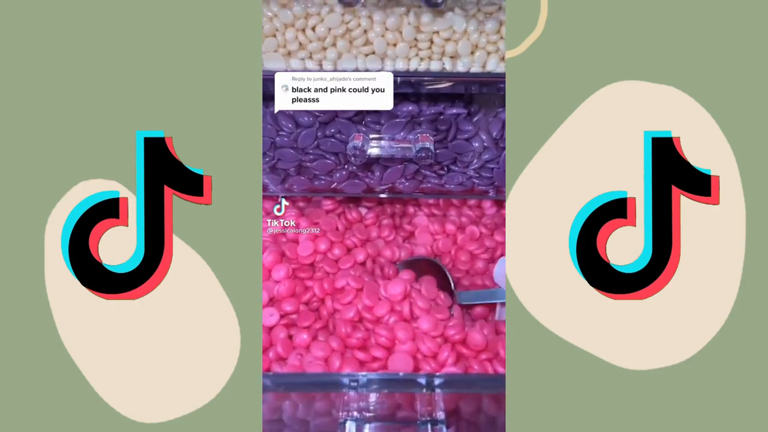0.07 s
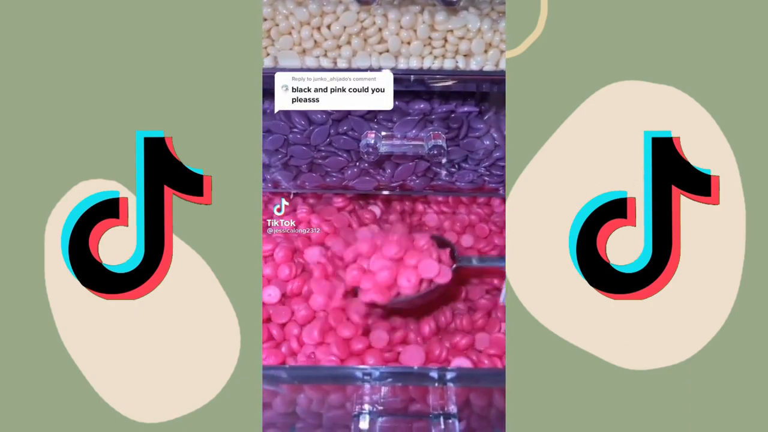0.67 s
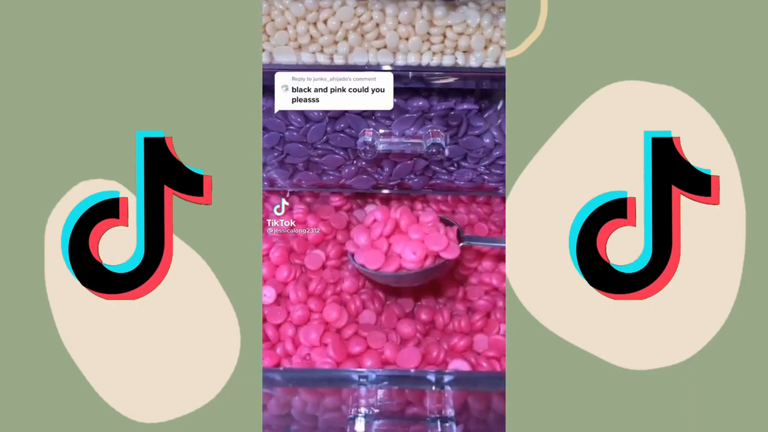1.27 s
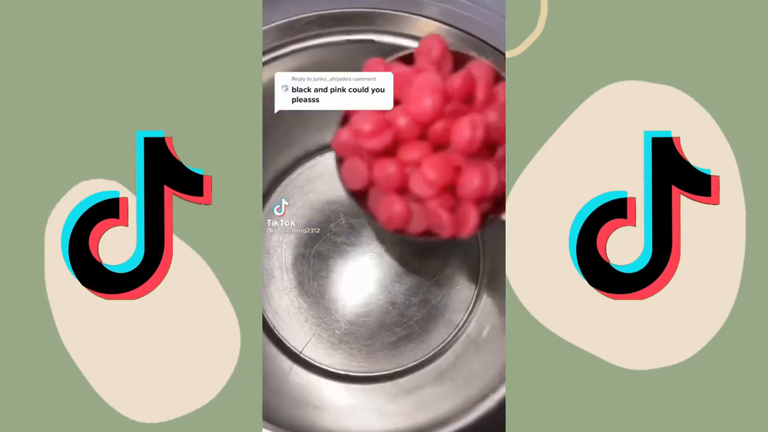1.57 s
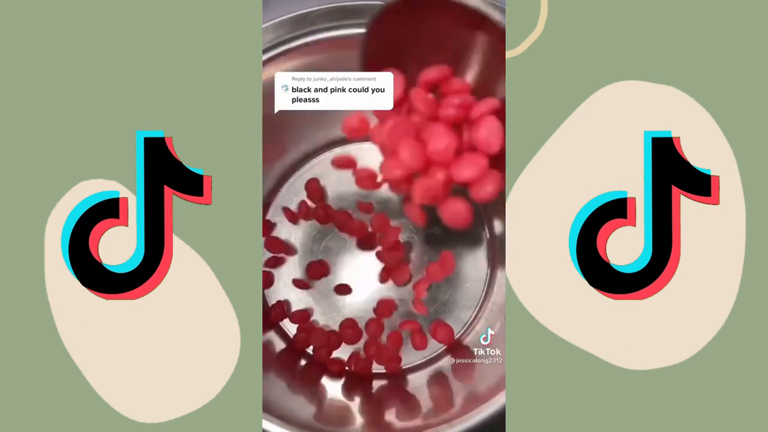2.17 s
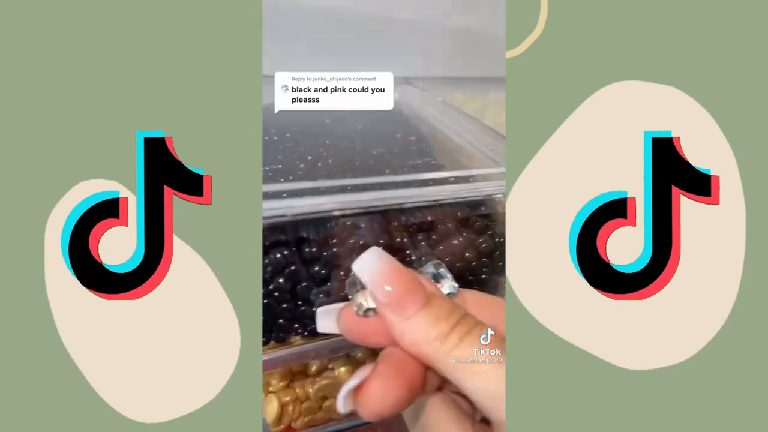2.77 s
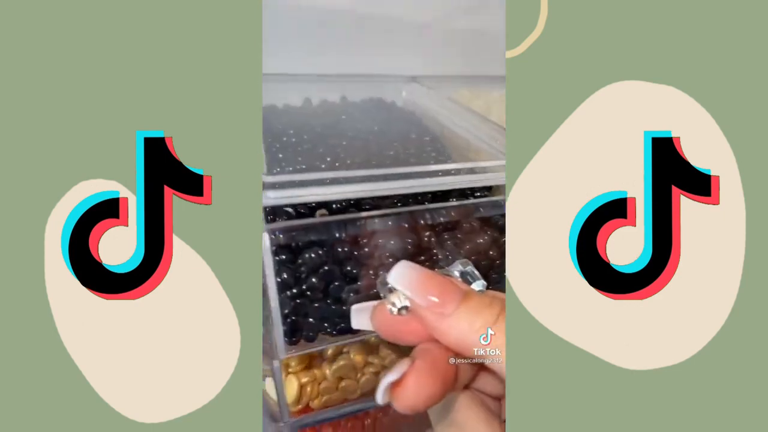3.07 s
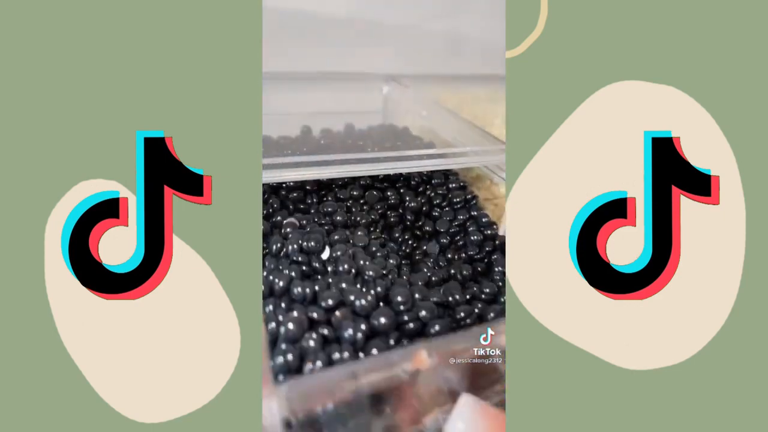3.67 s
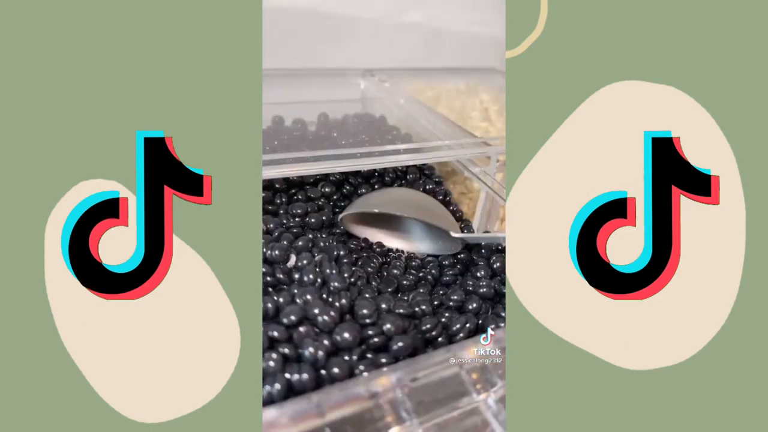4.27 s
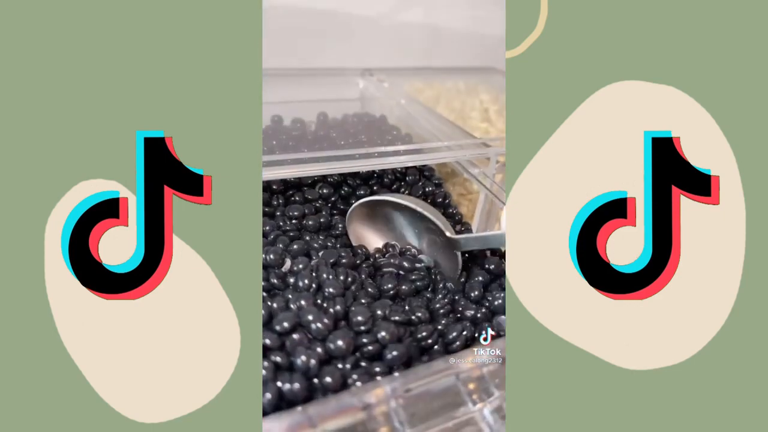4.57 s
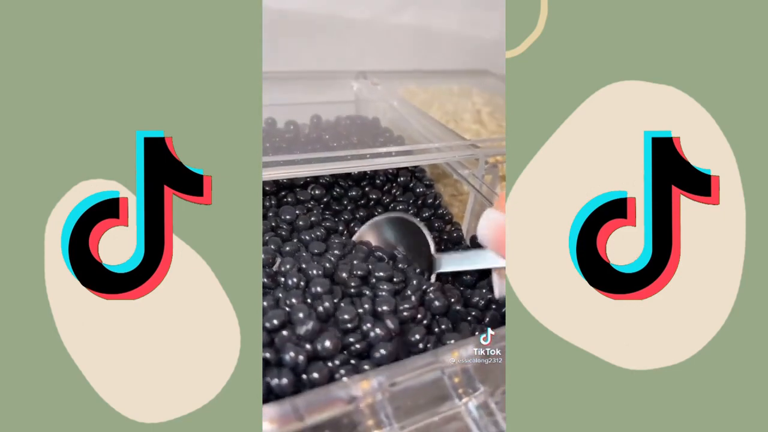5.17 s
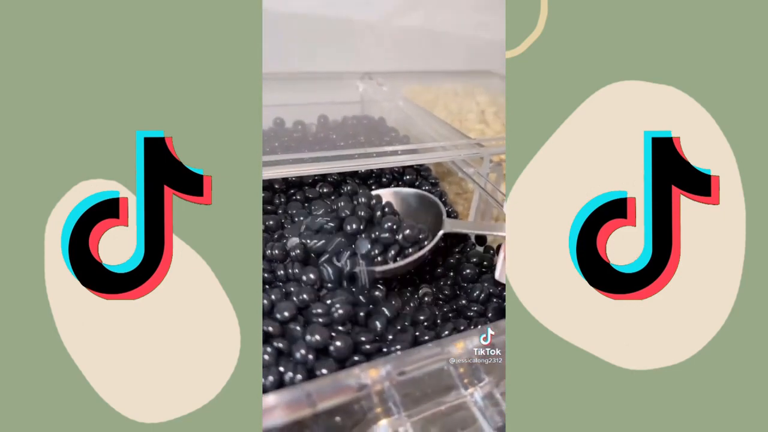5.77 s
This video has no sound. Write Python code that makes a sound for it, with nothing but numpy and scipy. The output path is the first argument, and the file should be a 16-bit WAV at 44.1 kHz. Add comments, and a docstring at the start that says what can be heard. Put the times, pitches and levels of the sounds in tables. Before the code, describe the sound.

Hard wax beads rattle as they are scooped from plastic bins and poured into a ringing steel bowl, with hollow knocks, heard close.

```python
"""Hard wax beads are dug from a plastic bin with a steel scoop and poured into a steel bowl.
Each impact is a brief broadband pulse, coloured by the resonances of the vessel it excites.
Flat beads are scooped and poured; a lid creaks by stick-slip friction and knocks back; then the
scoop thrusts into round beads, jams and lifts them. All is heard close up, over faint room noise
and a passing hum, in four passages separated by short silences."""
import sys
import numpy as np
from scipy import signal
from scipy.fft import rfft, irfft, next_fast_len
from scipy.io import wavfile
from scipy.ndimage import uniform_filter1d

SR = 44100
rng = np.random.default_rng(int(sys.argv[2]) if len(sys.argv) > 2 else 0)


def unload_wav(signal):
    """Save mono or channel-first audio to the path in sys.argv[1] as 16-bit WAV at rate SR, clipped to [-1, 1]."""
    wavfile.write(
        sys.argv[1],
        SR,
        np.round(np.clip(np.atleast_2d(signal).T, -1, 1) * 32767).astype(np.int16),
    )


N = 264776
TIME_S = np.arange(N) / SR
TOP_HZ = 15400

# loudest impacts among the flat beads: start_s, level_db (levels are relative within each table)
FLAT_IMPACTS = [(0.1815, -26.5), (0.2124, -20.5), (0.2264, -27), (0.2618, -29), (0.3466, -30),
                (0.4015, -21.5), (0.4189, -17), (0.4369, -22.5), (0.4604, -20.5), (0.4778, -15.5),
                (0.4914, -19.5), (0.5208, -24.5), (0.6185, -22.5), (0.6564, -26.5), (0.6744, -16.5),
                (0.6958, -16), (0.7282, -19.5), (0.7407, -18.5), (0.828, -27.5), (0.9058, -35.5),
                (1.0211, -31.5), (1.0919, -39)]
# pushes of the scoop: peak_s, level_db, build_s, settle_s
FLAT_PUSHES = [(.03, -39, 0.13, 0.041), (.225, -41.5, 0.032, 0.026), (.5, -35.5, 0.083, 0.044),
               (.735, -33, 0.045, 0.036), (1.02, -56, 0.43, 0.074)]
# response of the bin of flat beads: frequency_hz, gain_db
FLAT_RESPONSE = [(100, -19), (450, -14.5), (700, -7), (1000, -16), (1300, -6.5), (2200, -4), (3200, 0),
                 (4300, -11.5), (5200, -14), (8000, -6), (10500, -17), (14500, -13)]
# its resonances: pitch_hz, width_hz, lift_db
FLAT_MODES = [(699, 34, 8), (1252, 120, 8.5), (1713, 77, 10), (2220, 280, 7.5), (2787, 38, 7),
              (3140, 250, 2.5), (5135, 430, 12.5), (7030, 460, 3.5)]
def scoop_flat_beads():
    """Impact excitation: the scoop drives flat beads together and the plastic bin filters each click."""
    loud = impacts(FLAT_IMPACTS, rise_s=.0002, decay_s=.0021,
                   tail_db=-15, tail_s=.011, ping_db=-13, ping_s=.004)
    small = tumble(strokes(FLAT_PUSHES), per_s=330, scatter_db=1, decay_s=.0012)
    return resonate(undb(-10) * loud + undb(-1.5) * small, FLAT_RESPONSE, FLAT_MODES)


# clumps landing in the bowl: start_s, level_db, landing_s
CLUMPS = [(1.908, -29, 0), (1.9671, -24.5, 0.00023), (1.9867, -26, 0.004), (1.9989, -24, 0.015),
          (2.0526, -23.5, 0.0023), (2.0623, -21, .015), (2.102, -24, 0.0029), (2.1295, -26.5, 0.014),
          (2.15, -23.5, .011), (2.187, -23.5, 0.00073), (2.197, -24.5, 0.0033), (2.2165, -21.5, 0.017),
          (2.246, -21.5, 0.013), (2.293, -19, 0), (2.306, -24, 0.044), (2.328, -27.5, 0.016),
          (2.3518, -25.5, 0.019), (2.378, -22, 0.0024), (2.393, -23, 0.023), (2.413, -29.5, 0.017)]
# last stray beads hopping: start_s, level_db
STRAYS = [(2.4622, -23.5), (2.5187, -26), (2.5456, -26.5), (2.5715, -29.5), (2.601, -42), (2.6587, -47)]
# heap covering the bowl's floor: time_s, damped_fraction
HEAP_DAMPING = [(2.1, 0), (2.38, 0.18), (2.5, 0.6)]
# response of the steel bowl: frequency_hz, gain_db
BOWL_RESPONSE = [(40, -24), (110, -8), (250, -9.5), (520, -22.5), (850, 4), (1080, -8), (1400, -1),
                 (2100, -1.5), (2700, 4), (3400, -4), (6000, -2.5), (8300, -1), (10000, -8.5),
                 (12500, -7.5), (15000, -4.5)]
# its resonances: pitch_hz, width_hz, lift_db
BOWL_RESONANCES = [(770, 30, 2.5), (1243, 46, 9.9), (1680, 33, 6.4), (2414, 270, 4.1), (2651, 110, 9.2),
                   (2970, 260, 8.2), (3740, 48, 8.2), (4250, 150, 6.6), (4570, 29, 4), (5630, 400, 6.7),
                   (6020, 170, 8.7), (7690, 540, 11), (8060, 45, 4.7), (9000, 44, 9.6), (9330, 120, 6.8),
                   (11300, 220, 13), (12600, 260, 15), (14600, 840, 10)]
def pour_into_bowl(build_s=.001, fall_s=.012, bounce_s=.073, full_clump_s=.02):
    """Damped resonance: falling clumps of beads ring the bowl, and the growing heap mutes its modes."""
    leaders = impacts([(s, db) for s, db, _ in CLUMPS], rise_s=.0012, decay_s=.0018,
                      tail_db=-20.5, tail_s=.012, ping_db=-9, ping_s=.006)
    strays = impacts(STRAYS, rise_s=.001, decay_s=.002,
                     tail_db=-11, tail_s=.014, ping_db=-7.5, ping_s=.0077)
    landing_power = sum(envelope(s, db - 3, build_s, landing_s, fall_s) ** 2
                        for s, db, landing_s in CLUMPS if landing_s > 0)
    # the bigger the clump, the more beads go on bouncing
    bounce_power = sum(landing_s / full_clump_s * envelope(s, db - 17, build_s, landing_s, bounce_s) ** 2
                       for s, db, landing_s in CLUMPS)
    followers = tumble(np.sqrt(landing_power + bounce_power), per_s=700, scatter_db=2.5, decay_s=.0018)
    beads = leaders + undb(-11) * strays + followers
    damped = np.clip(np.interp(TIME_S, *np.transpose(HEAP_DAMPING)), 0, 1)
    ringing = resonate(beads, BOWL_RESPONSE, BOWL_RESONANCES)
    return (1 - damped) * ringing + damped * resonate(beads, BOWL_RESPONSE)


# loudest impacts among the round beads: start_s, level_db
ROUND_IMPACTS = [(4.789, -32), (5.034, -25), (5.3198, -27), (5.4124, -29), (5.5069, -26), (5.5588, -28),
                 (5.6161, -18.5), (5.6482, -25), (5.6636, -24), (5.7372, -29.5), (5.7763, -25),
                 (5.805, -22), (5.9631, -27.5)]
# thrusts of the scoop, each ending in a jam: jam_s, level_db, build_s, trickle_s
ROUND_THRUSTS = [(4.4, -48, 0.0058, 0.12), (4.521, -31, 0.0096, 0.073), (4.6002, -47, 0.0039, 0.015),
                 (4.8145, -28.5, 0.022, 0.085), (4.917, -47, 0.0021, 0.2), (5.048, -30, 0.007, 0.16),
                 (5.199, -38.5, 0.011, 0.085), (5.214, -39.5, 0.0078, 0.31)]
# response of the bin of round beads: frequency_hz, gain_db
ROUND_RESPONSE = [(100, -12.5), (400, -7), (630, -23), (900, -2), (1100, -8), (1800, -2.5), (2500, 2),
                  (3200, -1), (4200, -11.5), (8000, -12), (10500, -21.5), (14500, -19)]
# its resonances: pitch_hz, width_hz, lift_db
ROUND_MODES = [(857, 48, 9), (1416, 36, 6.7), (2420, 150, 1.4), (2740, 72, 2.3), (5880, 82, 3.6),
               (7750, 440, 2.6)]
def scoop_round_beads(crunch_s=.01):
    """Granular flow: round beads crunch and trickle at each thrust, then spill from the rising scoop."""
    loud = impacts(ROUND_IMPACTS, rise_s=.0001, decay_s=.0013,
                   tail_db=-23, tail_s=.036, ping_db=-11.5, ping_s=.0037)
    crunch = sum(envelope(s, db - 5, build_s, 0, crunch_s) for s, db, build_s, _ in ROUND_THRUSTS)
    trickle = undb(-19) * strokes(ROUND_THRUSTS)
    last_jam_s = ROUND_THRUSTS[-1][0]
    spill = envelope(5.63, -44.5, build_s=.25, hold_s=.14, settle_s=.32) * (TIME_S > last_jam_s)
    small = tumble(np.hypot(crunch + trickle, spill), per_s=700, scatter_db=5.5, decay_s=.0017)
    return resonate(undb(-12) * loud + small, ROUND_RESPONSE, ROUND_MODES)


# knocks on the bin: start_s, level_db, pitch_hz, decay_s
BIN_KNOCKS = [(2.965, -41, 434, 0.01), (2.991, -50, 295, 0.027), (3.073, -53.5, 430, 0.011),
              (3.152, -48.5, 296.7, 0.028), (3.727, -43.5, 362, 0.0093), (4.165, -23.5, 318, 0.017),
              (4.408, -46, 313, 0.04), (4.492, -41, 323, 0.035), (4.526, -34.5, 323.5, 0.022),
              (4.602, -24.5, 319, 0.0071), (4.635, -33, 370, 0.0049), (4.798, -28, 314.5, 0.031),
              (4.921, -38, 290, 0.015), (5.054, -26.5, 298.4, 0.014), (5.142, -37, 555, 0.0054),
              (5.217, -28.5, 282, 0.015), (5.298, -41, 298, 0.012), (5.348, -40, 283, 0.016)]
# modes of the bin walls: pitch_ratio, level_db
BIN_WALL_MODES = [(.38, -13.5), (0.651, -27.5), (0.999, -1.5), (1.16, -8.5), (1.88, -22), (2.68, -24.5)]
# rumble of the load of beads: frequency_hz, gain_db
RUMBLE_RESPONSE = [(50, -27), (95, -21), (125, 0), (165, -8), (205, 0), (300, 1), (450, -6), (700, -16.5),
                   (950, -21), (1500, -27), (4000, -42), (15000, -56)]
# hollow clack of the bin: frequency_hz, gain_db
CLACK_RESPONSE = [(200, -14.5), (500, -23.5), (700, -12.5), (950, -0.5), (1400, -12), (2500, -11),
                  (5000, -31.5), (15000, -37)]
def bin_knocks(swell_s=.0055, rumble_s=.02, clack_s=.0025):
    """Modal vibration: shoved by lid or scoop, the bin clacks, its walls ring and its load rumbles."""
    t = np.arange(SR // 4) / SR
    swell = 1 - np.exp(-t / swell_s)
    ring, rumble, clack = np.zeros((3, N))
    for s, db, pitch_hz, decay_s in BIN_KNOCKS:
        walls = np.zeros(len(t))
        for ratio, mode_db in BIN_WALL_MODES:
            detune, phase = rng.standard_normal(2)
            mode_hz = pitch_hz * ratio * (1 + .02 * detune)
            walls += undb(mode_db) * np.sin(2 * np.pi * mode_hz * t + np.pi * phase)
        add(ring, s, undb(db + 1.5) * swell * np.exp(-t / decay_s) * walls)
        add(rumble, s, undb(db - 4) * swell * np.exp(-t / rumble_s) * rng.standard_normal(len(t)))
        add(clack, s, undb(db - 6) * swell * np.exp(-t / clack_s) * rng.standard_normal(len(t)))
    return ring + resonate(rumble, RUMBLE_RESPONSE) + resonate(clack, CLACK_RESPONSE)


def scoop_jams():
    """Granular jamming: beads lock with a crack, pass the push on to the bin and rumble as they shift."""
    stops = [(s, db) for s, db, _, _ in ROUND_THRUSTS]
    crack = impacts(stops, rise_s=.0001, decay_s=.0032,
                    tail_db=-31, tail_s=.0099, ping_db=-24, ping_s=.0037)
    push = impacts(stops, rise_s=.001, decay_s=.005, tail_db=-16, tail_s=.018, ping_db=-20, ping_s=.004)
    shifting = tumble(undb(-17) * strokes(ROUND_THRUSTS), per_s=130, scatter_db=4, decay_s=.0092)
    beads = undb(-2) * resonate(crack, ROUND_RESPONSE, ROUND_MODES)
    steel = undb(-17) * resonate(crack, STEEL_RESPONSE)
    clack = undb(-2) * resonate(push, CLACK_RESPONSE)
    return beads + steel + clack + resonate(shifting, RUMBLE_RESPONSE)


# touches of the bare scoop: start_s, level_db
STEEL_TICKS = [(.9065, -46), (.9573, -44.5), (1.943, -48), (2.6958, -50), (2.701, -37), (2.7165, -47.5),
               (4.1205, -56.5)]
# light rubs past a rim: peak_s, level_db, build_s, settle_s
STEEL_RUBS = [(1.86, -66.5, 0.047, 0.042), (4.1, -72.5, 0.052, 0.047)]
# response of the steel scoop: frequency_hz, gain_db
STEEL_RESPONSE = [(300, -26.5), (1500, -5.5), (4500, -11), (6000, -1.5), (10500, -7), (13000, -1.5),
                  (15500, -8)]
# resonances of its rim: pitch_hz, width_hz, lift_db
STEEL_MODES = [(4360, 300, 20), (7050, 350, 10), (12200, 150, 12), (14400, 340, 14)]
def bare_scoop():
    """Hard contact: brief touches on steel give bright, dry ticks, and friction rings the scoop's rim."""
    ticks = impacts(STEEL_TICKS, rise_s=.001, decay_s=.0016,
                    tail_db=-20, tail_s=.011, ping_db=-15, ping_s=.003)
    rub = tumble(strokes(STEEL_RUBS), per_s=1100, scatter_db=8, decay_s=.002)
    return resonate(ticks, STEEL_RESPONSE) + resonate(rub, STEEL_RESPONSE, STEEL_MODES)


# creaks of the hinge: start_s, length_s, level_db, initial_slips_per_s
HINGE_CREAKS = [(2.808, .063, -67.5, 280), (2.8846, .09, -61, 162), (3.0103, .016, -57, 92),
                (3.817, .012, -62.5, 125)]
# response to one slip: frequency_hz, gain_db
SLIP_RESPONSE = [(200, -12), (1200, -6), (1800, -24), (2400, 2), (4200, -6.5), (5200, -14), (15000, -32)]
# hiss of the freely moving lid: frequency_hz, gain_db
SLIDE_RESPONSE = [(300, 11.5), (650, -6), (900, -8), (1600, -10.5), (3000, -6.5), (4200, -7.5), (8000, -9),
                  (15000, -16.5)]
# resonances of the plastic lid: pitch_hz, width_hz, lift_db
LID_RESONANCES = [(1030, 50, 1.5), (1259, 53, 13.7), (2330, 420, 7.2), (3050, 140, 4.7)]
def lid(max_slips=40, jitter=.12, slowing_s=.11):
    """Stick-slip friction: the hinge snaps the lid in slowing pulses, then runs free with a soft hiss."""
    slips = np.zeros(N)
    for start_s, length_s, db, slips_per_s in HINGE_CREAKS:
        age_s = 0
        for stretch in np.exp(jitter * rng.standard_normal(max_slips)):
            if age_s < length_s:
                add(slips, start_s + age_s, undb([db]))
                age_s += stretch * np.exp(age_s / slowing_s) / slips_per_s
    creak = undb(21) * resonate(slips, SLIP_RESPONSE, LID_RESONANCES)
    swing = envelope(3.234, -64.5, build_s=.096, hold_s=.45, settle_s=.25)
    slide = tumble(swing, per_s=720, scatter_db=2.5, decay_s=.00846)
    return creak + resonate(slide, SLIDE_RESPONSE, LID_RESONANCES)


def room_echo(sound, wet_db=-20, t60_s=.3, delay_s=.008):
    """Reverberation: dense reflections from the room follow the sound and decay exponentially."""
    t = np.arange(SR // 2) / SR
    echo = rng.standard_normal(len(t)) * np.exp(-np.log(1000) * t / t60_s) * (t > delay_s)
    return undb(wet_db) * signal.fftconvolve(sound, echo / np.linalg.norm(echo))[:N]


def hum(pitch_hz=127):
    """Random modulation: a low tone wavers in level and pitch as its two quadrature parts wander."""
    knots = np.linspace(0, N, 130)
    in_phase = np.interp(np.arange(N), knots, rng.standard_normal(len(knots)))
    quadrature = np.interp(np.arange(N), knots, rng.standard_normal(len(knots)))
    phase = 2 * np.pi * pitch_hz * TIME_S
    level = envelope(.93, -59, build_s=.23, hold_s=.57, settle_s=.0093)
    return level * ((1 + in_phase) * np.sin(phase) + quadrature * np.cos(phase))


# spectrum of the room noise: frequency_hz, gain_db
ROOM_SPECTRUM = [(25, -23), (55, -6), (110, -7.5), (165, -10.5), (205, -5.5), (330, -11.5), (500, -12),
                 (850, -14.5), (1350, -24), (2700, -30.5), (5000, -42.5), (15000, -49.5)]
def room_noise():
    """Ambient noise: a steady random background with most of its power in the bass."""
    return resonate(rng.standard_normal(N), ROOM_SPECTRUM)


def impacts(rows, rise_s, decay_s, tail_db, tail_s, ping_db, ping_s, ping_count=7):
    """Impact transients: each (start_s, level_db) contact gives a crack, short pings and a weak tail."""
    t = np.arange(SR // 8) / SR
    onset = slice(SR // 400)
    decay = np.hypot(np.exp(-t / decay_s), undb(tail_db) * np.exp(-t / tail_s))
    shape = decay * (1 - np.exp(-t / rise_s))
    fade = 1 - t / t[-1]
    out = np.zeros(N)
    for start_s, db in rows:
        # the place of contact decides which pitches ring
        pitches_hz = rng.uniform(900, TOP_HZ, (ping_count, 1))
        pings = undb(ping_db) * np.exp(-t / ping_s) * np.sin(2 * np.pi * pitches_hz * t).sum(axis=0)
        spectrum = rfft(shape * rng.standard_normal(len(t)))
        # a hard contact feeds all broad bands alike
        band_power = uniform_filter1d(np.abs(spectrum) ** 2, size=160)
        crack = irfft(spectrum / np.sqrt(band_power), len(t))
        hit = crack / np.sqrt(np.mean(crack[onset] ** 2)) + pings
        add(out, start_s, undb(db) * hit * fade / np.sqrt(np.mean(hit[onset] ** 2)))
    return out


def tumble(level, per_s, scatter_db, decay_s):
    """Shot noise: small contacts of random timing and force add in energy and follow a given level."""
    touch = rng.random(N) < per_s / SR
    force = undb(scatter_db * np.clip(rng.standard_normal(N), -2, 2))
    energy = signal.lfilter([1], [1, -np.exp(-1 / (decay_s * SR))], touch * force ** 2) + 1e-9
    local_mean = np.abs(uniform_filter1d(energy, SR // 16)) + 1e-9
    return np.sqrt(energy / local_mean) * rng.standard_normal(N) * level


def resonate(excitation, response, modes=()):
    """Linear filtering: a broad response with resonance peaks on it, scaled to unit power gain."""
    n = 2 * next_fast_len(N // 2 + SR // 10)
    hz = np.arange(n // 2 + 1) * SR / n
    knots_hz, knots_db = np.transpose(response)
    gain = undb(np.interp(np.log(hz + 1), np.log(knots_hz), knots_db))
    for pitch_hz, width_hz, lift_db in modes:
        detuning = 2 * (hz - pitch_hz) / width_hz
        gain *= np.sqrt(1 + (undb(lift_db) ** 2 - 1) / (1 + detuning ** 2))
    gain /= np.sqrt(np.mean(gain ** 2 * (hz < TOP_HZ)))
    # minimum phase: the ringing follows the strike
    cepstrum = irfft(np.log(gain))
    cepstrum[1:n // 2] *= 2
    cepstrum[n // 2 + 1:] = 0
    return irfft(rfft(excitation, n) * np.exp(rfft(cepstrum)))[:N]


def envelope(peak_s, level_db, build_s, hold_s, settle_s):
    """Exponential growth and decay: a gain reaches its level at peak_s, holds, then dies away."""
    t = TIME_S - peak_s
    early, late = np.maximum(-t, 0), np.maximum(t - hold_s, 0)
    return undb(level_db) * np.exp(-np.minimum(early / build_s + late / settle_s, 30))


def strokes(rows):
    """Summed envelopes: each stroke swells and at once settles."""
    return sum(envelope(s, db, build_s, 0, settle_s) for s, db, build_s, settle_s in rows)


def undb(db):
    """Decibels to amplitude ratio."""
    return 10 ** (np.asarray(db) / 20)


def add(out, start_s, sound):
    """Superposition: mix a sound in at start_s."""
    i = int(np.clip(start_s * SR, 0, N - 1))
    out[i:i + len(sound)] += sound[:N - i]


# audible passages and their room noise: start_s, end_s, noise_start_db, noise_end_db
PASSAGES = [(0, 1.459, -59.5, -57.5), (1.534, 2.729, -86.5, -68), (2.807, 4.228, -73, -68),
            (4.308, 6.079, -76.5, -55.5)]
def scene(fade_s=.003):
    """Superposition: all sources sound in four gated passages, each with its own level of room noise."""
    beads = scoop_flat_beads() + pour_into_bowl() + scoop_round_beads()
    direct = beads + bare_scoop() + lid() + bin_knocks() + scoop_jams()
    sound = direct + room_echo(direct) + hum()
    noise = room_noise()
    out = undb(-97.5) * noise
    for start_s, end_s, start_db, end_db in PASSAGES:
        gate = np.clip(np.minimum(TIME_S - start_s, end_s - TIME_S) / fade_s, 0, 1)
        noise_gain = undb(np.interp(TIME_S, [start_s, end_s], [start_db, end_db]))
        out += gate * (sound + noise_gain * noise)
    return out[None]


def record(dry):
    """Band limiting: the microphone drops the deepest bass and the highest treble."""
    high_pass = signal.butter(2, 35, "high", fs=SR, output="sos")
    low_pass = signal.ellip(8, .2, 70, TOP_HZ, fs=SR, output="sos")
    return signal.sosfilt(low_pass, signal.sosfilt(high_pass, dry))


dry = scene()
out = record(dry)
unload_wav(out)
```